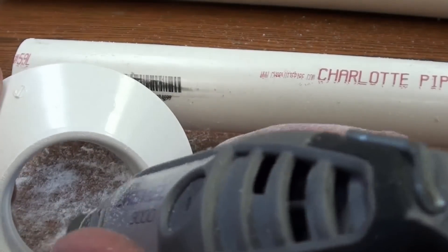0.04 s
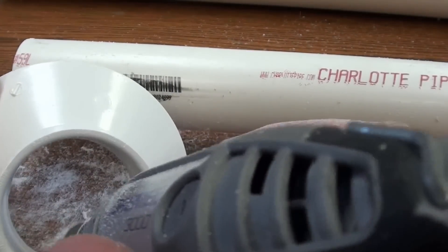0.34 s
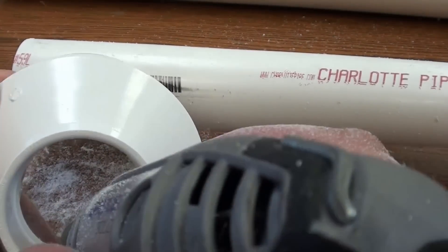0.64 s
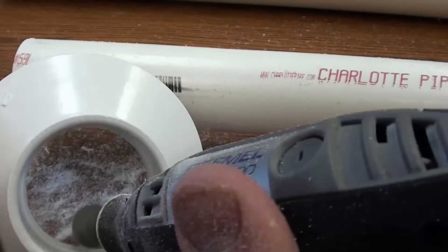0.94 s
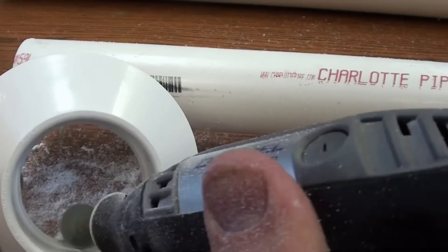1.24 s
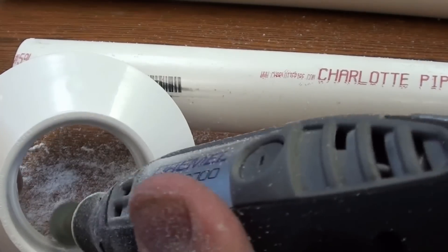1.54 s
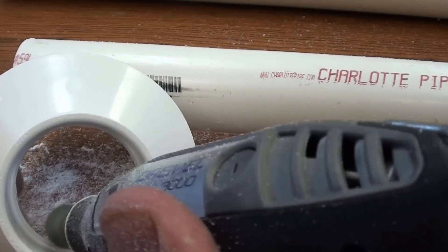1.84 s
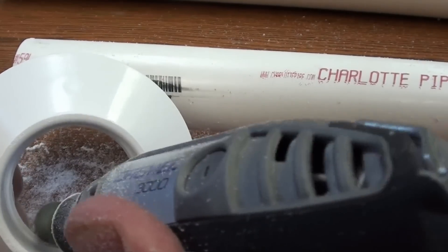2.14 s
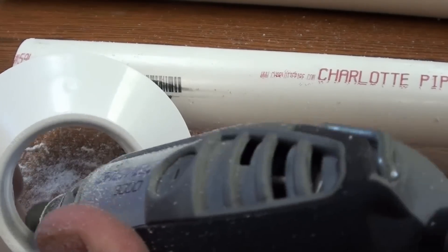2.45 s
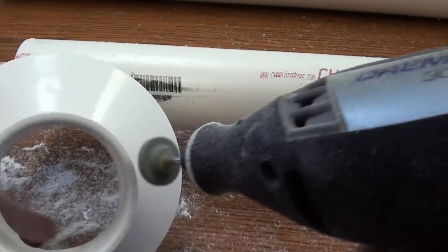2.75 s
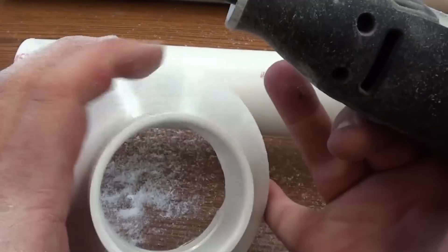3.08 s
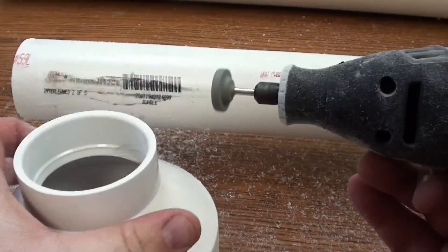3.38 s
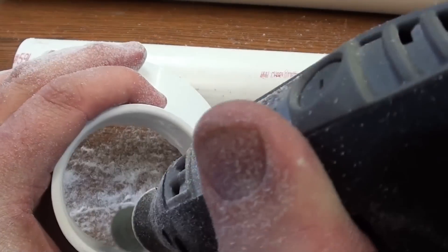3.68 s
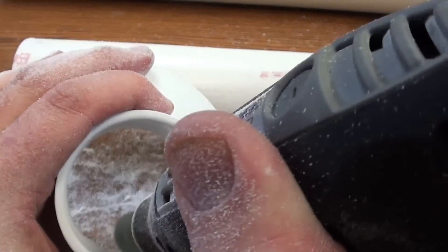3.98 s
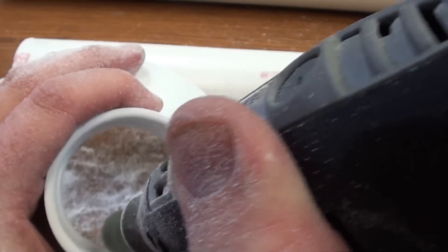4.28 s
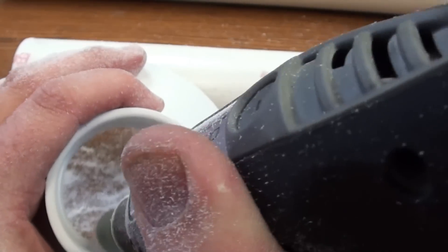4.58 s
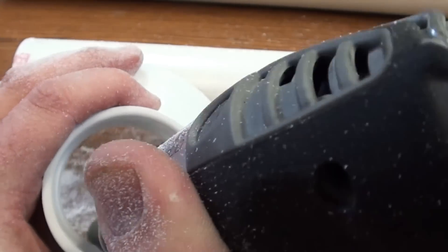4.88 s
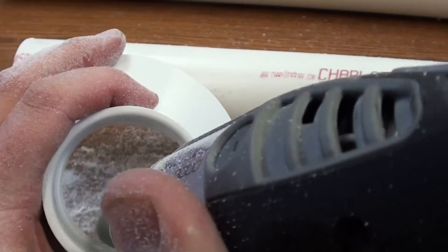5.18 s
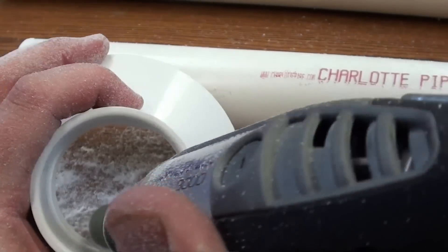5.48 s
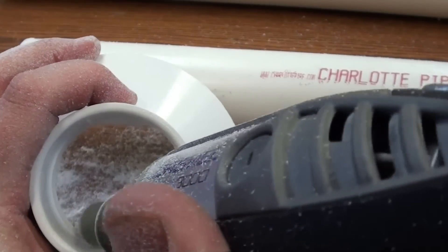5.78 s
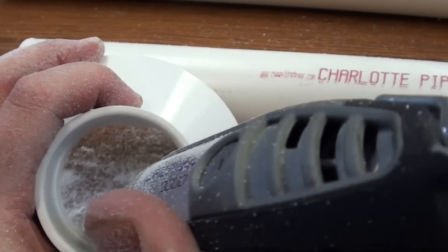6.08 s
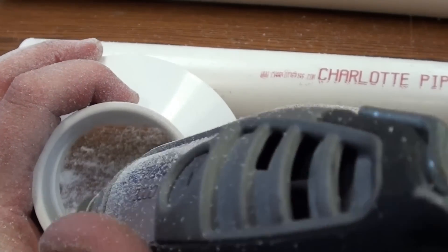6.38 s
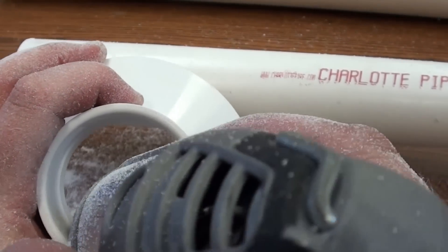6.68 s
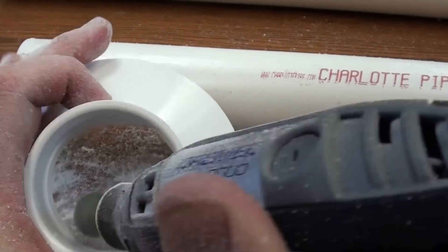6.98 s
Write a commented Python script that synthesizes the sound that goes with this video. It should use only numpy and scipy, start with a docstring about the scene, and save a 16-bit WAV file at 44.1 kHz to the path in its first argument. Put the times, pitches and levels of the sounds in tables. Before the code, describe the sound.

A small rotary tool whines and grinds inside a plastic pipe fitting, spinning free briefly as the fitting is knocked about, then grinding again.

```python
"""Rotary tool grinding plastic

A handheld tool grinds the inside of a pipe fitting, close up. The motor whines at five beats a turn
and sags under load; the stone buzzes, chatters and throws grit in quick throbs. Midway it is lifted
and spins free while the fitting is knocked into a new place, then bites again. A second, brief lift
comes near the end. Fan air and a low room rumble lie underneath."""
import sys
import numpy as np
from scipy import signal
from scipy.fft import rfft, irfft, next_fast_len
from scipy.io import wavfile
from scipy.ndimage import uniform_filter1d

SR = 44100
rng = np.random.default_rng(int(sys.argv[2]) if len(sys.argv) > 2 else 0)


def dump(signal):
    """Clip the signal to [-1, 1] and save it as 16-bit WAV at the path in sys.argv[1]."""
    limited = np.clip(np.atleast_2d(signal).T, -1, 1)
    pcm = np.round(limited * 32767).astype(np.int16)
    wavfile.write(sys.argv[1], SR, pcm)


N = 318843

FREE_SHAFT_HZ, RUN_UP_TAU_S, TOUCH_FADE_S = 558.3, 0.084, 0.06
LOOSE_BOUNCE_HZ, LOOSE_DEPTH_DB, LOOSE_SWING_RATIO = 20.96, 1.4, 0.003
SWING_LEAD_RAD, MAX_FLARE_LAG_S = 0.21, 0.015
CHATTER_LOSS_PER_SQUEAL_DB, SPEED_RATIO_PER_SQUEAL_DB = 1.1, 0.0012
FLUTTER_HZ, LOWPASS_HZ = 720, 15650

# Shaft speed, one list per grinding pass: time_s, shaft_hz
PASS_SPEEDS = [
    [(0, 476.8), (0.21, 507.8), (0.471, 492.2), (1.154, 487.6), (1.384, 476.0), (1.564, 489.4),
     (1.7, 464.1), (1.859, 490.8), (2.484, 439.4), (2.709, 491.0)],
    [(3.57, 554.9), (3.756, 509.1), (4.175, 509.0), (4.345, 492.5), (4.912, 465.8), (5.012, 501.4),
     (5.149, 478.6), (5.333, 498.9), (5.66, 470.6), (6.499, 462.6), (6.985, 448.1)],
    [(7.15, 549.9), (7.222, 501.7)],
]
# Hand presses in (negative: eases off): centre_s, length_s, speed_loss_hz
HAND_PUSHES = [(0.07, 0.063, 38.913), (0.753, 0.177, 84.047), (1.003, 0.121, -30.582),
               (1.734, 0.029, 20.559), (2.526, 0.043, 25.46), (3.995, 0.157, 19.669),
               (4.953, 0.057, 27.648), (5.274, 0.069, 27.653), (5.686, 0.074, 28.285),
               (6.571, 0.102, 35.454), (6.763, 0.056, 11.197), (6.856, 0.07, -40.647),
               (6.951, 0.057, 16.283)]
# Runs of even bouncing: start_s, end_s, rate_hz, depth_db, speed_swing_ratio
BOUNCE_RUNS = [(1.154, 1.518, 15.4, 1.4, 0.0017), (2.039, 2.356, 26.5, 3, 0.0054),
               (2.443, 2.55, 19.5, 2, 0.019), (4.633, 4.888, 23.8, 2.5, 0.0075),
               (5.313, 5.602, 21.36, 1.5, 0.0049), (5.773, 6.011, 21.8, 2.4, 0.0084),
               (6.051, 6.47, 18.8, 3.5, 0.014), (6.543, 6.76, 13.9, 0.5, 0.013)]
# Stone skids and squeals (negative: breaks out): centre_s, length_s, gain_db
SKID_SQUEALS = [(0.069, 0.053, 8), (0.137, 0.04, 0.5), (0.199, 0.043, 10), (.237, 0.026, -13),
                (0.274, .04, 11.5), (0.341, 0.026, 13.5), (.97, 0.076, 3), (1.062, 0.033, 4.5),
                (1.205, 0.033, 8.5), (1.404, 0.035, 3.5), (1.69, 0.081, 4), (1.858, 0.071, -1.5),
                (2.033, 0.042, 2.5), (2.505, 0.016, 2.5), (2.673, 0.063, -9.5), (3.883, 0.23, -2),
                (4.181, .045, 5), (4.263, 0.0606, 4), (4.637, 0.048, 3.5), (4.864, 0.087, 3.5),
                (4.999, 0.052, 5), (5.112, 0.089, -7), (5.294, 0.045, 4), (6.561, 0.041, 3),
                (6.787, .06, -12.5), (6.913, .04, 2.5)]
# Whine under load: shaft_hz, partial1_db, partial2_db, partial3_db, partial4_db
WHINE_BY_SPEED = [(398, -27.1, -35, -35, -33.5), (439, -28.5, -38, -38.5, -29),
                  (474.2, -33, -34.5, -33, -30.5), (482.7, -33, -35, -32.5, -35.5),
                  (492.6, -30.5, -33, -33.5, -38.1), (519, -31, -32.5, -30.5, -33)]
# Whine as the tool turns in the air, per lift: time_s, partial1_db, partial2_db, partial3_db, partial4_db
WHINE_BY_LIFT = [
    [(2.73, -26.5, -23.5, -54, -25), (2.85, -28, -30.5, -38.5, -18.5), (3.06, -28.5, -33.5, -28.5, -23.5),
     (3.13, -30.7, -38, -31.3, -29.5), (3.28, -26, -30.5, -35.7, -25), (3.44, -28.6, -35.0, -31.5, -24.5),
     (3.54, -23.5, -29, -47, -27.7)],
    [(7.02, -24, -26.5, -38, -34), (7.15, -27, -29.5, -42.0, -24)],
]
# Slow swell of the loaded whine, before each partial's share: time_s, swell_db
LOADED_SWELL = [(0.25, -8), (0.45, -20.5), (0.7, 3), (1.0, -4.9), (1.3, -14.5), (1.55, -11), (1.7, -1.7),
                (2.4, 3.5), (2.65, 1.5), (3.65, -2.5), (4.0, -7), (4.45, 3.5), (5.3, 2.5), (5.85, 5.5),
                (6.6, 4.5), (6.78, 5.5), (6.9, 4), (7.2, -1)]
# Swell taken by partials 1-4: share_ratio
PARTIAL_SHARES = [0.38, 0.86, 0.77, 0.71]
# A lightly held stone chatters, a firmly pressed one does not: shaft_hz, level_db
CHATTER_LEVELS = [(410, -76), (440, -50.5), (462, -49.5), (474, -40.5), (485, -36), (503, -34.5),
                  (520, -35.5), (558, -38)]
# Chatter spectrum: freq_hz, gain_db
CHATTER_SPECTRUM = [(150, -43), (430, -32), (525, -15.5), (620, -13.5), (750, -14.5), (1060, -25),
                    (1300, -27), (1550, -4), (1980, 3), (2500, -8), (3000, -9.5), (3600, 0), (4400, 0.5),
                    (5300, 3.5), (6100, -19), (7500, 5), (10500, -3.5), (15500, -0.5)]
# Spot being ground: time_s, wall_ring_db, fine_hiss_db
GROUND_SPOT = [(0, -31, -15), (.7, -25, 3), (1.1, 0, -24), (1.8, 4.5, 0), (2.7, -0.5, 0), (3.7, -31, 5),
               (4.4, 0, 1.5), (5.5, 3, -1), (5.9, 4, 0), (6.55, -2, -8), (7.2, 6.5, 5)]
# Grit spectrum: freq_hz, gain_db
GRIT_SPECTRUM = [(100, -25), (400, -24.5), (1050, -14.5), (1300, -12.5), (2100, -7), (3200, -11.5),
                 (4500, 5.5), (5900, -3.5), (7500, 8), (10000, 1), (12800, 11), (15500, -7.5)]
# Base level of grit and fan air: time_s, level_db
HISS_LEVELS = [(0, -35), (.75, -35), (1.3, -34.5), (2, -35.5), (2.15, -39), (2.6, -35.5), (2.8, -42),
               (3.55, -41), (3.8, -34.5), (4.55, -32), (4.83, -43), (5.1, -32.5), (5.7, -34.5),
               (6.2, -37.5), (6.87, -32), (7.02, -40.5), (7.13, -38.5), (7.2, -33.5)]
# Stone digs in: centre_s, length_s, level_db
DIG_GROWLS = [(0.748, 0.077, -46), (5.684, 0.02, -34.5)]
# Fan air spectrum: freq_hz, gain_db
FAN_SPECTRUM = [(100, -30), (500, -17), (1200, -9.5), (2200, -1), (3500, -3.5), (4500, 2), (6200, 8),
                (8000, 4.5), (10500, 8.5), (13000, 5.5), (15500, 5.5)]
# Fitting knocks on the bench: start_s, level_db, crack_offset_db
BENCH_KNOCKS = [(0.048, -44, -17), (0.97, -44, -18), (1.083, -40, -14), (2.805, -39, -16),
                (2.832, -36.5, 11.5), (2.861, -42, -4), (2.895, -39, 9), (2.921, -35, 12),
                (3.06, -30.5, 3.5), (3.374, -33.5, 14.5), (5.645, -40, -20), (6.024, -48.5, -20),
                (6.57, -42, -23)]
# Modes of the fitting: pitch_hz, level_db, t60_s
FITTING_MODES = [(606, -6, 0.071), (666, 2.5, 0.049), (1078, 9.5, 0.045), (1340, 4.5, 0.1),
                 (1555, 13.5, 0.014), (2320, -19, .015), (3970, -12, .015)]
# Knock crack spectrum: freq_hz, gain_db
CRACK_SPECTRUM = [(100, -49), (400, -28), (1000, -5), (1700, 11), (3000, 4.5), (4200, 10.5), (7000, 8.5),
                  (15000, -27)]
# Room rumble spectrum: freq_hz, gain_db
RUMBLE_SPECTRUM = [(20, -7.5), (50, -7), (100, -9), (200, -9.5), (400, -10.5), (1500, -33)]
# Room rumble level: time_s, level_db
RUMBLE_LEVELS = [(0, -72.5), (1.5, -66), (4.8, -69), (6.58, -65), (7.2, -65)]
# Treble position as the tool moves: time_s, leftward_pan
TREBLE_PAN = [(0, 1.5), (1.1, 0.4), (2.45, 2.5), (2.85, -1.5), (3.4, -3.5), (4.2, 0.2), (5.6, 0.7),
              (6.55, 5.5), (7.23, 3)]
# Phase offset between two microphone ports: centre_hz, width_hz, half_lag_rad
PORT_PHASES = [(2510, 500, 0.077), (9760, 1700, 0.21)]


def shaft():
    """Speed in Hz and contact 0-1. Passes and pushes brake the shaft; lifted, it runs up."""
    t = np.arange(N) / SR
    sag_hz, contact = np.zeros(N), np.zeros(N)
    for speeds in PASS_SPEEDS:
        land_s, leave_s = speeds[0][0], speeds[-1][0]
        sag_decay = np.exp(-np.maximum(t - leave_s, 0) / RUN_UP_TAU_S)
        sag_hz = np.where(t >= land_s, (FREE_SHAFT_HZ - curves(speeds)[0]) * sag_decay, sag_hz)
        contact += gate(land_s + TOUCH_FADE_S / 2, leave_s - TOUCH_FADE_S / 4, TOUCH_FADE_S)
    sag_hz += sum(loss_hz * hump(at_s, length_s, order=3) for at_s, length_s, loss_hz in HAND_PUSHES)
    return FREE_SHAFT_HZ - sag_hz, np.minimum(contact, 1)


def bouncing():
    """Bite depth in dB and speed swing of the bouncing stone: even runs, loose in between."""
    t = np.arange(N) / SR
    loose_rad = angle_of(LOOSE_BOUNCE_HZ * (1 + 0.15 * walk(4.047)))
    phasor = np.exp(1j * (loose_rad + 0.411 * walk(19.24)))
    depth_db, swing = np.full(N, LOOSE_DEPTH_DB), np.full(N, LOOSE_SWING_RATIO)
    for start_s, end_s, rate_hz, run_db, run_swing in BOUNCE_RUNS:
        inside = gate(start_s, end_s, 1 / rate_hz)
        phasor += inside * (np.exp(2j * np.pi * rate_hz * (t - start_s)) - phasor)
        depth_db += inside * (run_db - depth_db)
        swing += inside * (run_swing - swing)
    phasor *= np.exp(1j * 0.225 * walk(20.1))
    bite_shape = phasor.real + 0.088 * (phasor ** 2).real
    ahead = phasor * np.exp(1j * SWING_LEAD_RAD)
    speed_shape = ahead.real + 0.29 * (ahead ** 2).imag  # skewed: unequal rise and fall
    return depth_db * bite_shape, swing * speed_shape


def whine_levels(shaft_hz, contact):
    """Six partial levels in dB, set by load on the plastic or by how the tool is held in the air."""
    swell_db, = curves(LOADED_SWELL)
    rows = zip(lookup(WHINE_BY_SPEED, shaft_hz), PARTIAL_SHARES, curves(np.vstack(WHINE_BY_LIFT)))
    levels_db = []
    for base_db, share, lifted_db in rows:
        loaded_db = base_db + share * (swell_db + 0.66 * walk(7.3))
        levels_db.append(contact * loaded_db + (1 - contact) * lifted_db - 0.4)
    # the top two need a strong buzz
    fourth_db = levels_db[3]
    shortfall_db = contact * np.minimum(fourth_db + 29, 0)
    fifth_db = fourth_db - 10 + 2.6 * contact + 0.065 * shortfall_db
    sixth_db = fourth_db - 28 + 25.3 * contact + 0.5 * shortfall_db
    return levels_db + [fifth_db, sixth_db]


def whine(shaft_hz, beat_rad, contact, throb_db, squeal_db):
    """Motor whine: six harmonics of the beat, roughened to a buzz as the stone grips and slips."""
    levels_db = whine_levels(shaft_hz, contact)
    rough_db = 1.52 * stick_slip(60) + 0.61 * walk(510)
    flutter_rad = angle_of(FLUTTER_HZ * (1 + 0.0238 * contact * walk(57)))
    tone = 0
    for k, level_db in enumerate(levels_db, 1):
        sensitivity = min(0.54 + 0.086 * k, 1)
        # the buzz flares just after each bite
        flare_db = np.roll(throb_db, int(sensitivity ** 3 * MAX_FLARE_LAG_S * SR))
        contact_db = contact * (rough_db + 2.3 * walk(56)) + 0.9 * flare_db
        flicker_db = sensitivity * contact_db + 1.55 * walk(25)
        # partial 1 is mostly the motor's own, so it follows squeals less
        skid_db = squeal_db if k > 1 else 0.54 * np.maximum(squeal_db, -3)
        sideband = undb(-21.5 - 11 * contact / k) * np.cos(k * beat_rad - flutter_rad)
        tone += undb(level_db + flicker_db + skid_db) * (np.cos(k * beat_rad) + sideband)
    flutter_tone = undb(levels_db[0] - 39.5 + 4.5 * walk(26)) * contact * np.cos(flutter_rad)
    return np.sqrt(2) * tone + flutter_tone


def chatter(beat_rad, turn_rad, contact, bite):
    """Sharp taps of the stone ring the wall; their strength swings once and twice a turn."""
    taps = 0.44 + sum(np.cos(k * beat_rad) for k in range(1, 7))
    once = undb(2 * walk(70)) * np.cos(turn_rad + 1.1 * walk(40))
    twice = undb(2.5 * walk(70)) * np.cos(2 * turn_rad + 1.5 * walk(45))
    blows = taps * (once + 0.33 * twice + 0.41 * walk(1000))
    wall_db, _ = curves(GROUND_SPOT)
    wall = unit(resonance(resonance(blows, 8890, 560), 8940, 566))
    wall *= undb(wall_db - 2 + 2 * walk(47))
    return (colour(blows, CHATTER_SPECTRUM) + wall) * bite * (0.13 + 1.01 * contact)


def grit(beat_rad, turn_rad, bite):
    """Grains tear off chips: dense clicks bunched at each tap, partly repeating every turn."""
    grains = rng.standard_normal(N) * undb(2.4 * np.minimum(rng.exponential(size=N), 3))
    turn_ago = np.searchsorted(turn_rad, turn_rad - 2 * np.pi)
    grains = grains + 0.4 * grains[turn_ago] + 0.2 * grains[turn_ago[turn_ago]]
    clicks = grains * undb(5.4 * np.cos(beat_rad))
    _, fine_db = curves(GROUND_SPOT)
    fine_hiss = unit(resonance(resonance(clicks, 13700, 3200), 13700, 3200))
    fine_hiss *= undb(fine_db - 4.5 + 2 * walk(72))
    return (colour(clicks, GRIT_SPECTRUM) + fine_hiss) * bite


def growl(beat_rad):
    """Pressed hard, the stone catches on every third beat only."""
    envelope = sum(undb(db) * hump(at_s, length_s) for at_s, length_s, db in DIG_GROWLS)
    return envelope * sum(gain * np.cos(k * beat_rad / 3) for k, gain in [(1, 0.3), (2, 1), (4, 1), (5, 1)])


def fan_air():
    """The cooling fan blows through the vents."""
    return colour(rng.standard_normal(N), FAN_SPECTRUM) * undb(2.34 * walk(26))


def knocks(size=8192, crack_t60_s=0.053):
    """The fitting hits the bench: a short crack and a dull ring."""
    rings, crack_envelope = np.zeros(N + size), np.zeros(N + size)
    t = np.arange(size) / SR
    for start_s, level_db, crack_db in BENCH_KNOCKS:
        ring = 0
        for pitch_hz, mode_db, t60_s in FITTING_MODES:
            detuned_hz = pitch_hz * (1 + 0.013 * rng.standard_normal())
            ring += undb(mode_db - 60 * t / t60_s) * np.cos(2 * np.pi * detuned_hz * t)
        start = int(start_s * SR)
        rings[start:start + size] += undb(level_db - 7) * ring
        crack_envelope[start:start + size] += undb(level_db + crack_db + 1.5 - 60 * t / crack_t60_s)
    cracks = crack_envelope[:N] * colour(rng.standard_normal(N), CRACK_SPECTRUM)
    # so small a body radiates no bass
    return signal.sosfilt(signal.butter(2, 380, "high", fs=SR, output="sos"), rings[:N] + cracks)


def scrape():
    """The fitting judders over the bench as it is pushed along."""
    push, = curves([(2.79, 0.016), (2.81, 0.89), (2.92, 0.85), (2.96, 0)])
    friction = rng.standard_normal(N) * undb(1.6 * walk(200))
    ring = sum(undb(db) * resonance(friction, hz, 3 / t60_s) for hz, db, t60_s in FITTING_MODES)
    return undb(-41) * push * unit(ring)


def rumble(throb_db):
    """Low noise around the bench, pulsing with the bounces."""
    level_db, = curves(RUMBLE_LEVELS)
    return colour(rng.standard_normal(N), RUMBLE_SPECTRUM) * undb(level_db + 2 * walk(4) + 0.88 * throb_db)


def stereo_ports(tool):
    """Left and right: treble shifts as the tool moves; the two ports differ slightly in phase."""
    lag_bands = sum(lag_rad * resonance(tool, hz, width_hz) for hz, width_hz, lag_rad in PORT_PHASES)
    quadrature = signal.hilbert(lag_bands, next_fast_len(N)).imag[:N]
    side = 0.079 * curves(TREBLE_PAN)[0] * resonance(tool, 9900, 1700) + quadrature
    return tool + np.array([side, -side])


def stick_slip(rate_hz, size=64):
    """Stress builds and lets go at uneven intervals; rms 1."""
    ramp = np.cumsum(rate_hz * undb(4 * walk(rate_hz))) / SR % 1
    return unit(uniform_filter1d(ramp - 0.5, size))


def walk(rate_hz):
    """Smooth random drift up to rate_hz; rms 1."""
    lowpass = signal.butter(2, min(rate_hz, SR / 3), fs=SR, output="sos")
    return unit(signal.sosfilt(lowpass, rng.standard_normal(N)))


def colour(x, spectrum, size=2048):
    """Minimum-phase filter through (freq_hz, gain_db) points; output rms 1."""
    freq_hz, gain_db = np.transpose(spectrum)
    grid_hz = np.maximum(np.arange(size // 2 + 1) * SR / size, 1)
    grid_db = np.interp(np.log(grid_hz), np.log(freq_hz), gain_db)
    cepstrum = irfft(np.log(undb(grid_db)))
    cepstrum[1:size // 2] *= 2
    cepstrum[size // 2 + 1:] = 0
    impulse = irfft(np.exp(rfft(cepstrum)))
    return unit(signal.oaconvolve(x, impulse)[:N])


def resonance(x, centre_hz, width_hz):
    """Band-pass, gain 1 at centre."""
    return signal.lfilter(*signal.iirpeak(centre_hz, centre_hz / width_hz, fs=SR), x)


def hump(centre_s, length_s, order=2):
    """Smooth bump; a higher order flattens its top."""
    return np.exp(-np.abs(2 * (np.arange(N) / SR - centre_s) / length_s) ** order)


def gate(start_s, end_s, fade_s):
    """1 from start to end, fading to 0 outside."""
    t = np.arange(N) / SR
    return np.clip(np.minimum(t - start_s, end_s - t) / fade_s + 1, 0, 1)


def lookup(table, x):
    """Columns interpolated along the first."""
    keys, *columns = np.transpose(table)
    return [np.interp(x, keys, column) for column in columns]


def curves(table):
    """Columns interpolated over time."""
    return lookup(table, np.arange(N) / SR)


def angle_of(rate_hz):
    """Running phase in rad."""
    return 2 * np.pi * np.cumsum(rate_hz) / SR


def unit(x):
    """Scale to rms 1."""
    return x / np.sqrt(np.mean(x ** 2))


def undb(db):
    """dB to gain."""
    return 10 ** (np.asarray(db) / 20)


def scene():
    """One shaft drives whine, chatter and grit; bounces swing bite and speed; squeal displaces chatter."""
    shaft_hz, contact = shaft()
    throb_db, swing = contact * np.array(bouncing())
    skids_db = sum(db * hump(at_s, length_s) for at_s, length_s, db in SKID_SQUEALS)
    squeal_db = contact * (skids_db + 1.1 * walk(13.95))
    swing += SPEED_RATIO_PER_SQUEAL_DB * np.maximum(squeal_db, 0)
    swing += contact * (0.00268 * walk(110) + 0.002 * walk(21.84))
    turn_rad = angle_of(shaft_hz * (1 + swing + 0.00012 * walk(17)))
    jitter_rad = (0.016 + 0.031 * contact) * walk(250)
    beat_rad = 5 * turn_rad + jitter_rad
    bite = undb(throb_db + 1.5 * stick_slip(55))
    chatter_db = lookup(CHATTER_LEVELS, shaft_hz)[0] + 1.6 * throb_db
    chatter_db -= CHATTER_LOSS_PER_SQUEAL_DB * np.maximum(squeal_db, -3)
    hiss_db, = curves(HISS_LEVELS)
    tool = whine(shaft_hz, beat_rad, contact, throb_db, squeal_db) + growl(beat_rad)
    tool += undb(chatter_db + 2) * chatter(beat_rad, turn_rad, contact, bite)
    tool += undb(hiss_db + 4) * contact * grit(beat_rad, turn_rad, bite)
    tool += undb(hiss_db + 12.5 - 11.35 * contact) * fan_air()
    room = rumble(throb_db)
    return stereo_ports(tool) + knocks() + scrape() + room


def record(dry):
    """Steep treble cut."""
    return signal.sosfilt(signal.ellip(12, 0.1, 80, LOWPASS_HZ, fs=SR, output="sos"), dry)


dry = scene()
out = record(dry)
dump(out)
```